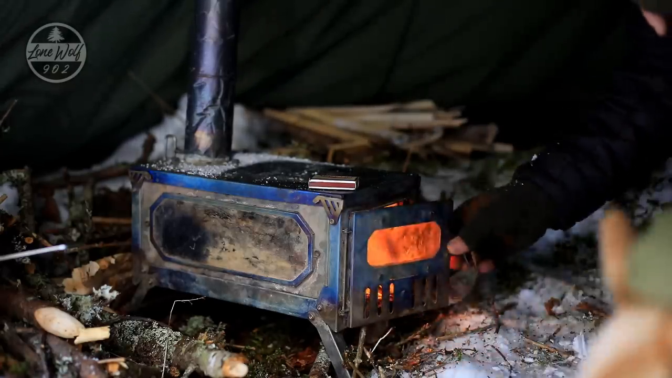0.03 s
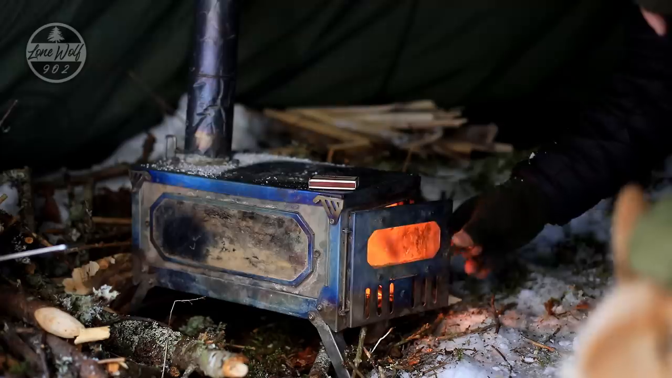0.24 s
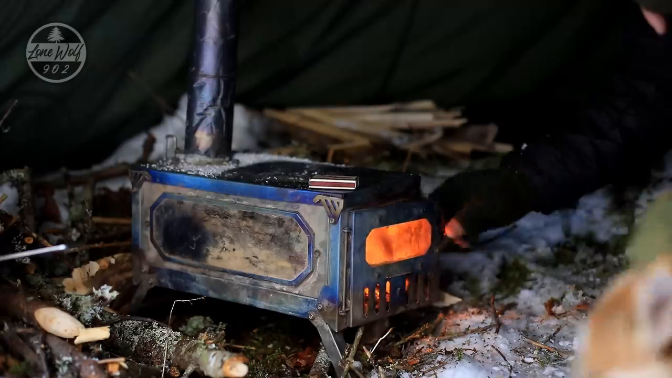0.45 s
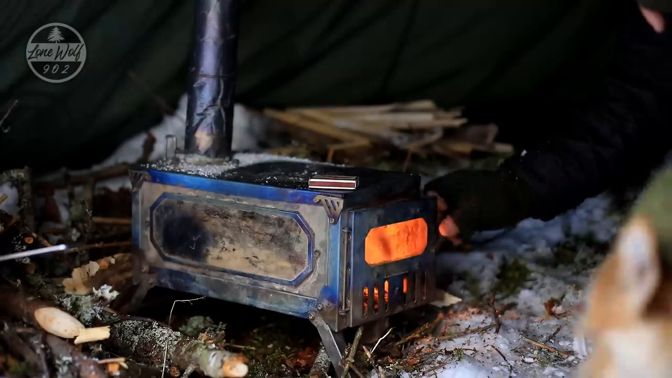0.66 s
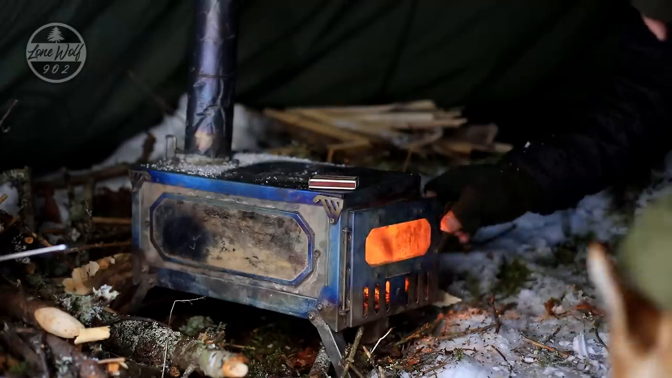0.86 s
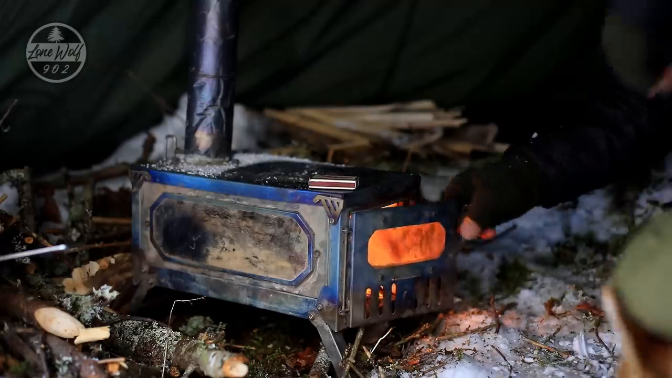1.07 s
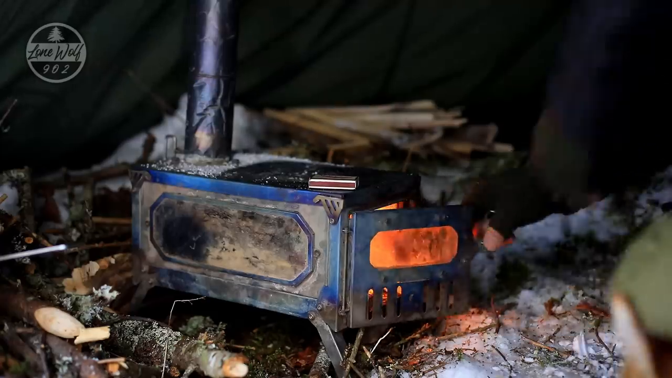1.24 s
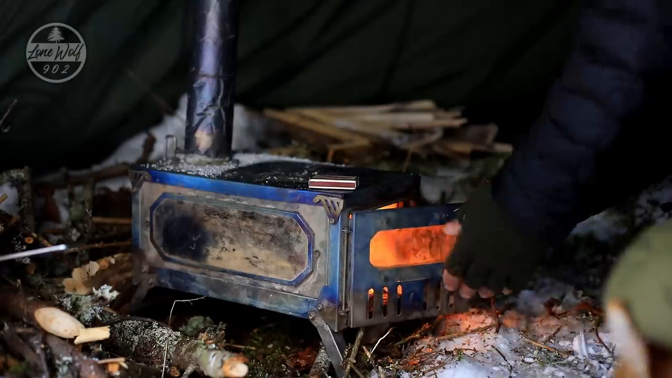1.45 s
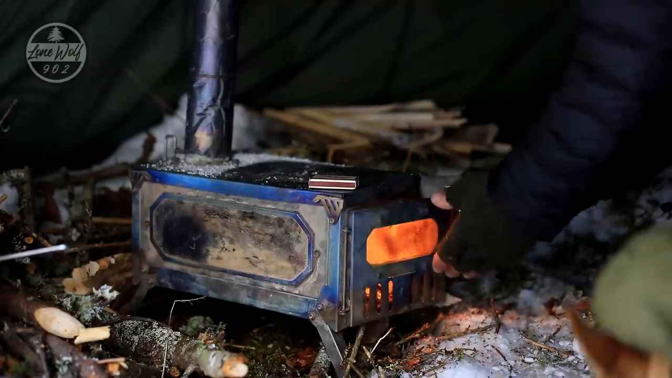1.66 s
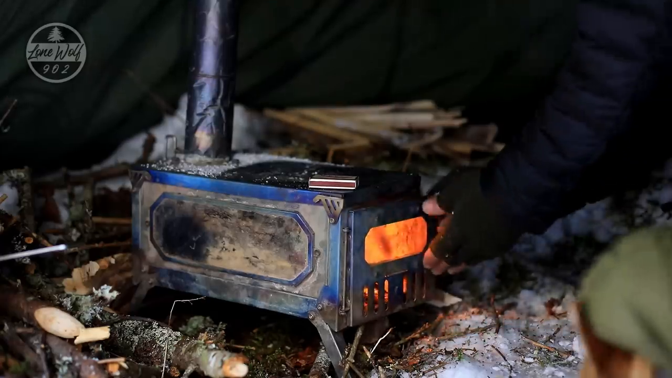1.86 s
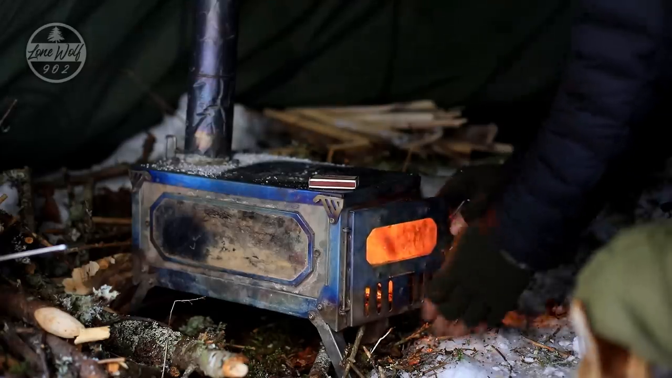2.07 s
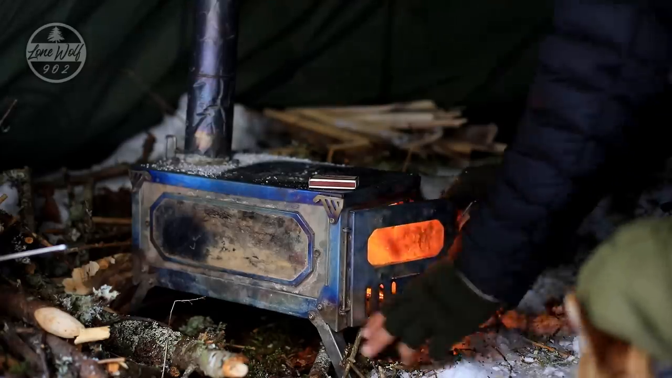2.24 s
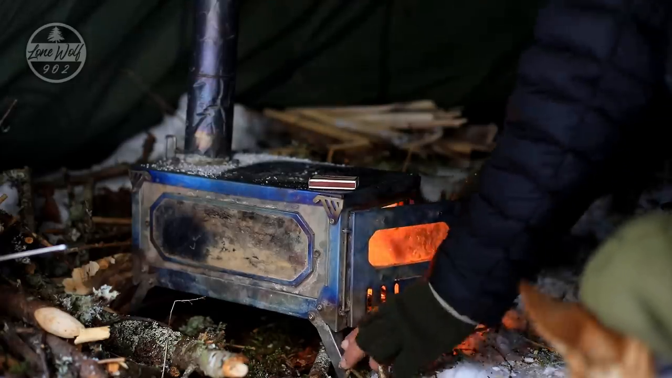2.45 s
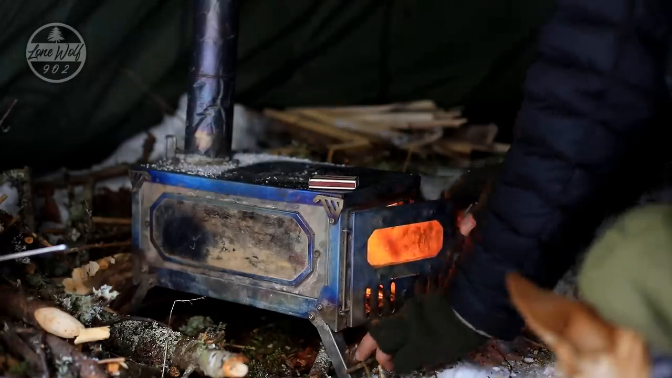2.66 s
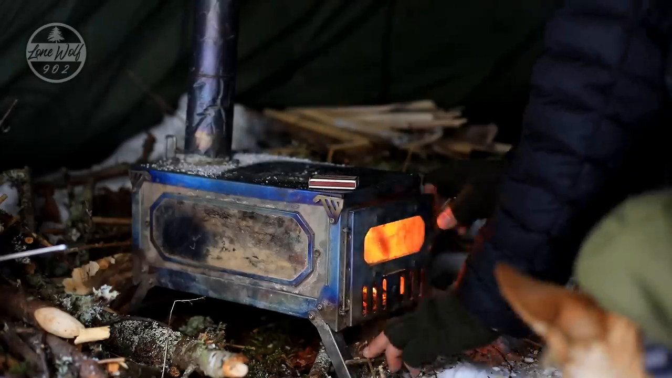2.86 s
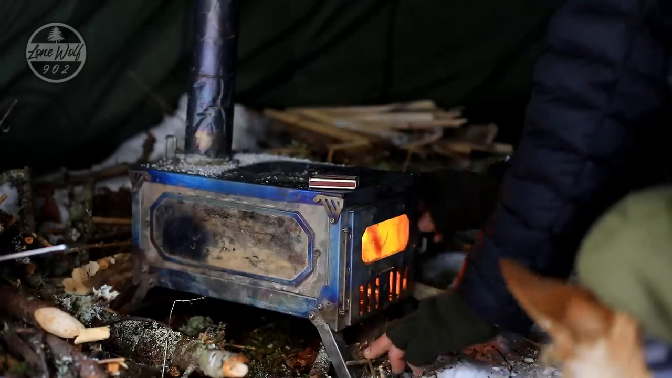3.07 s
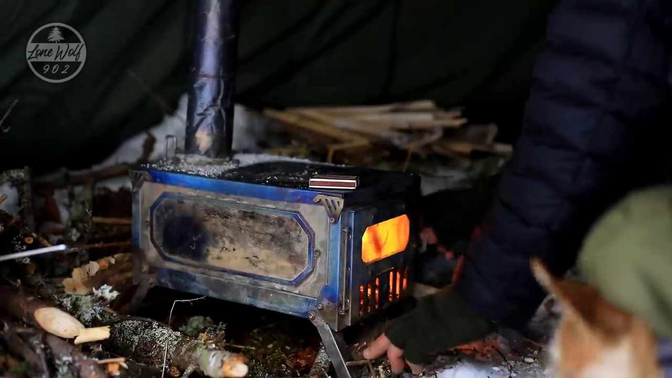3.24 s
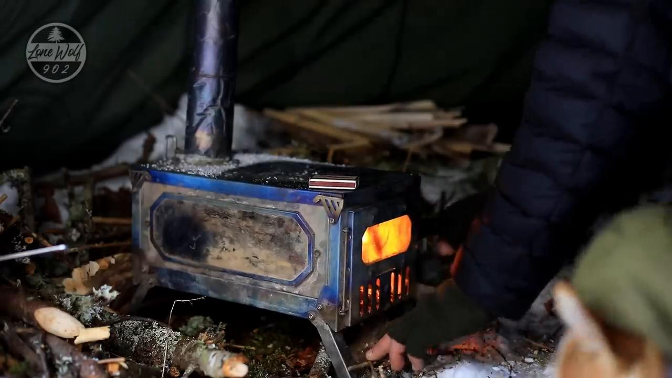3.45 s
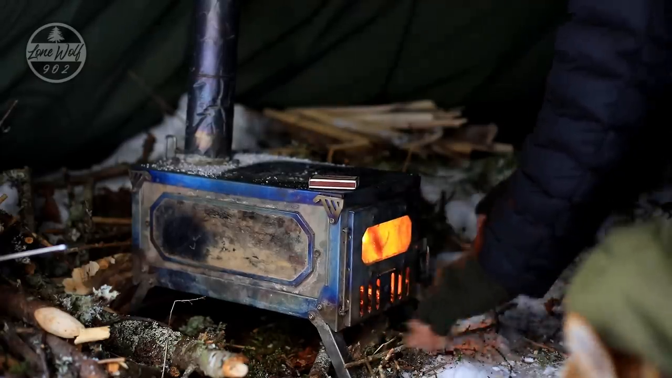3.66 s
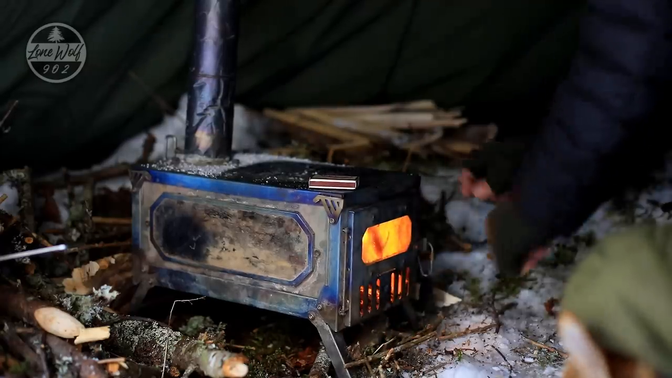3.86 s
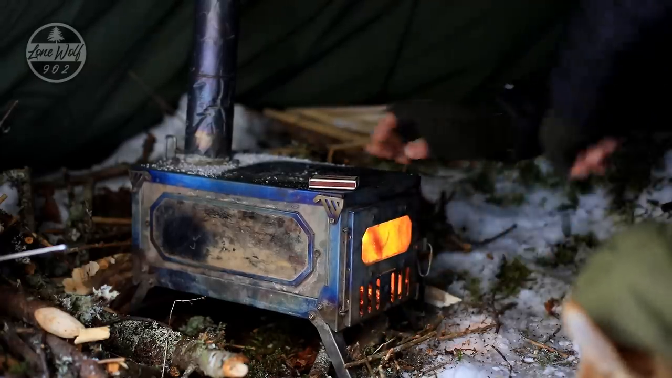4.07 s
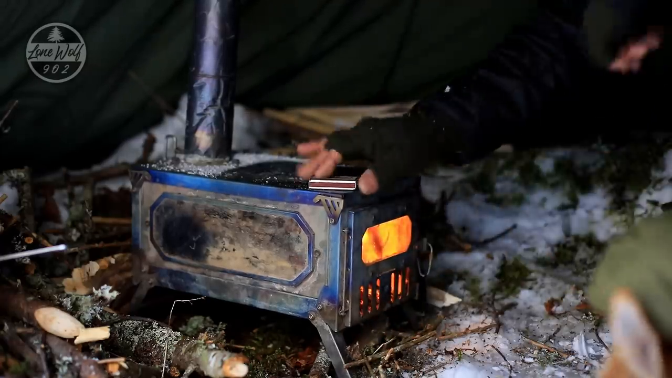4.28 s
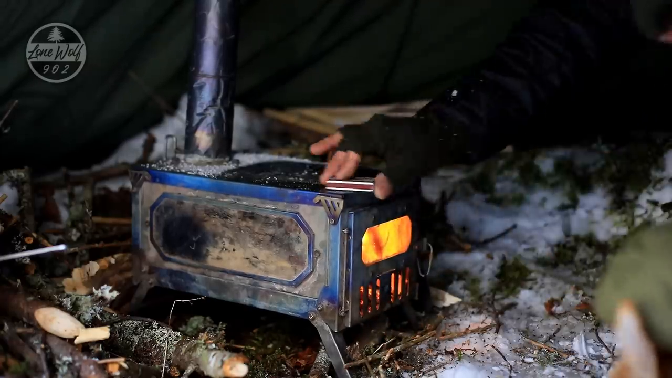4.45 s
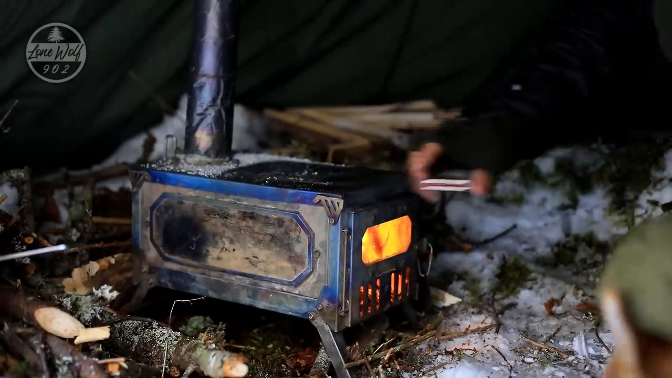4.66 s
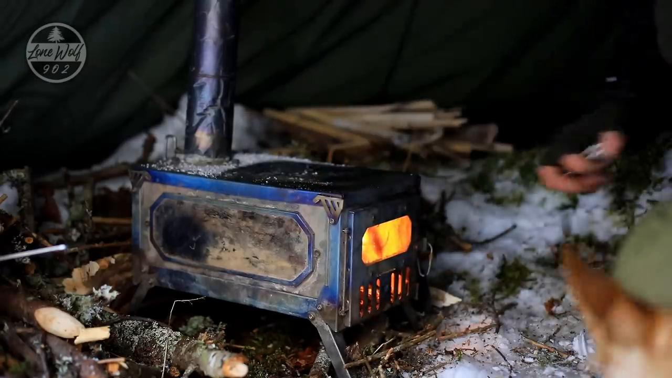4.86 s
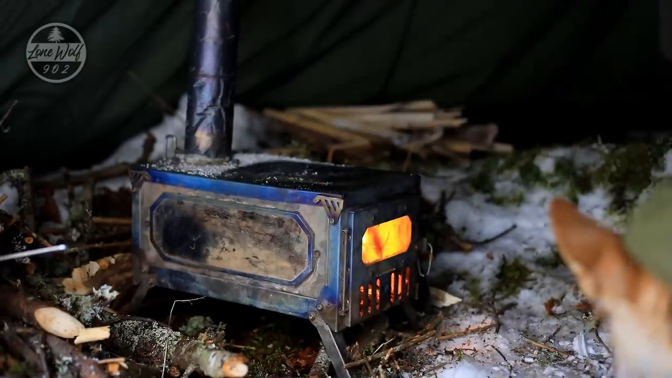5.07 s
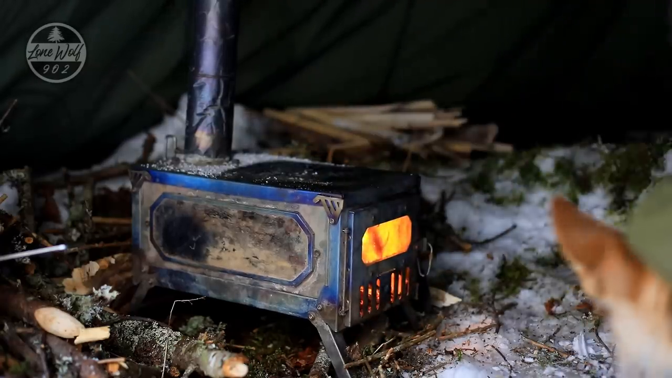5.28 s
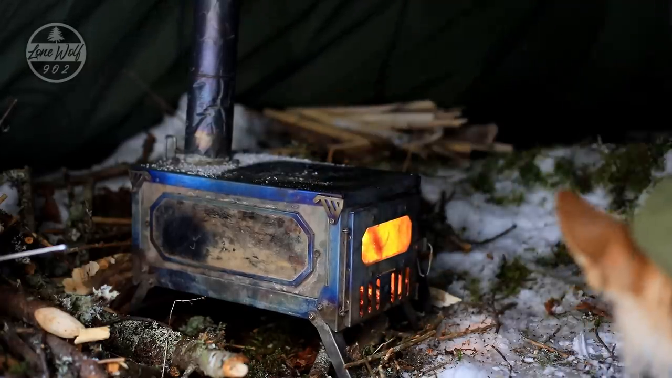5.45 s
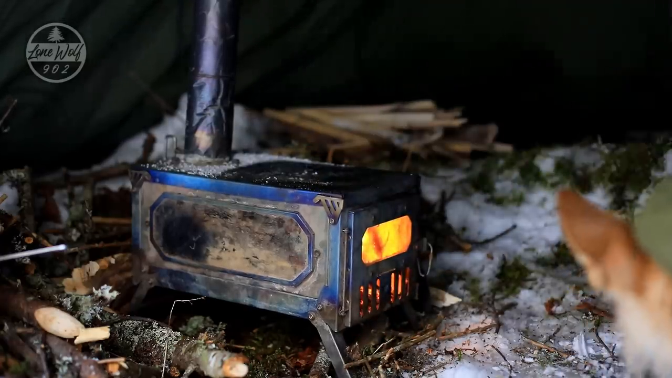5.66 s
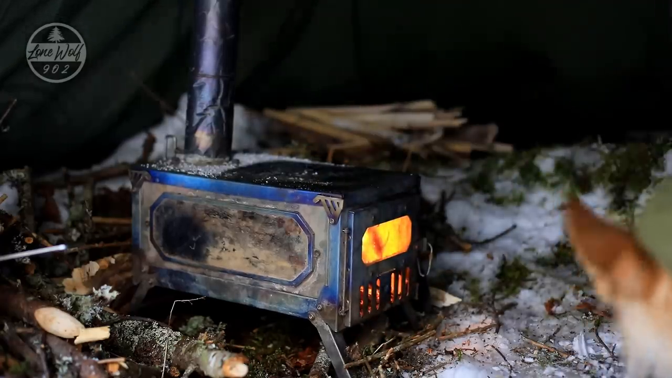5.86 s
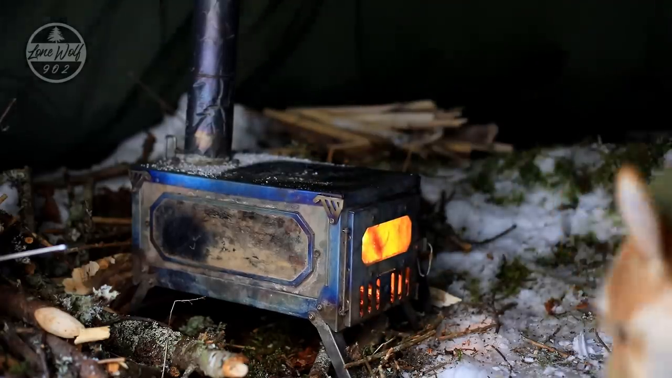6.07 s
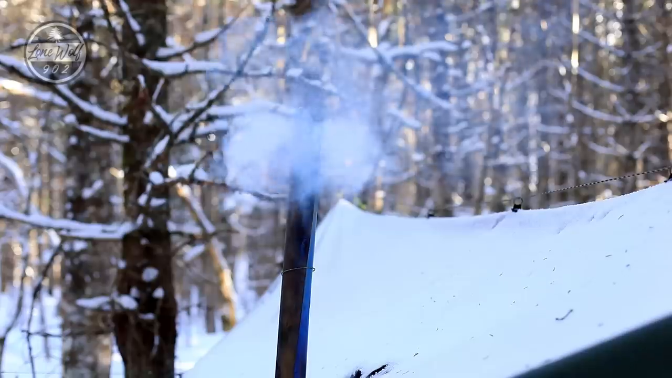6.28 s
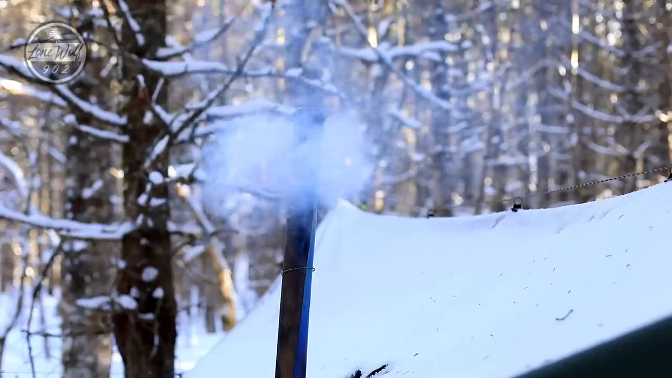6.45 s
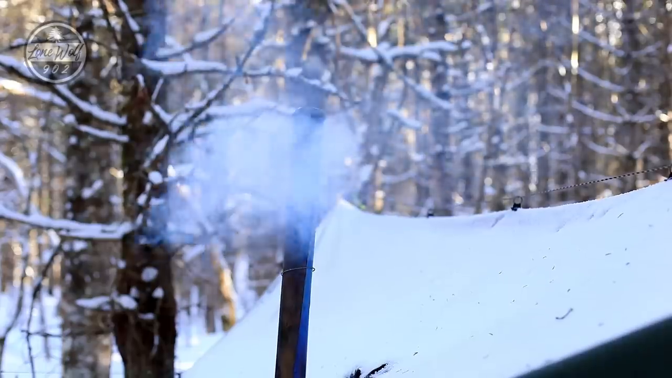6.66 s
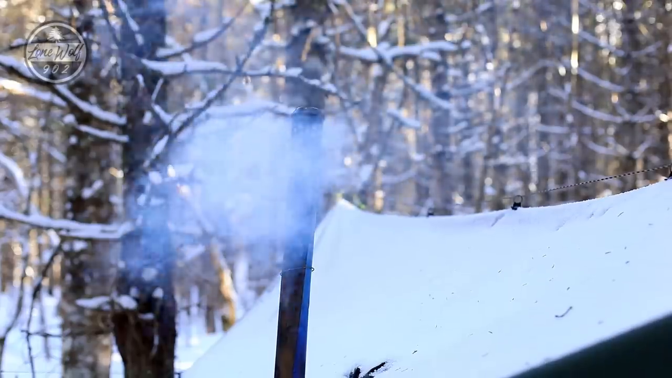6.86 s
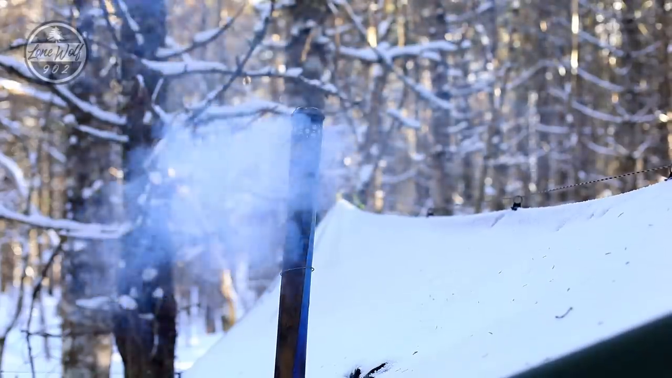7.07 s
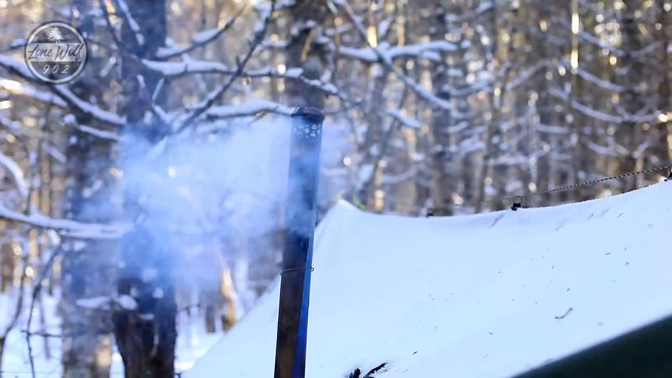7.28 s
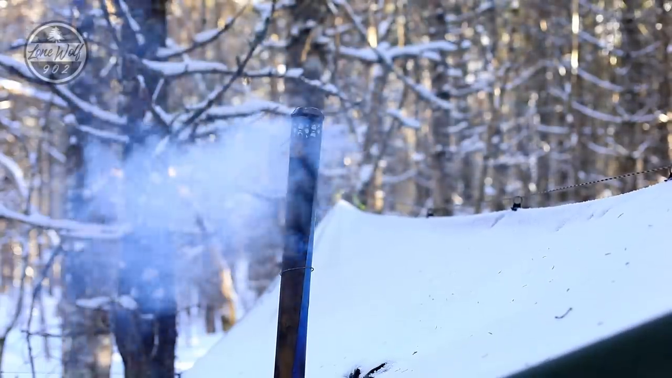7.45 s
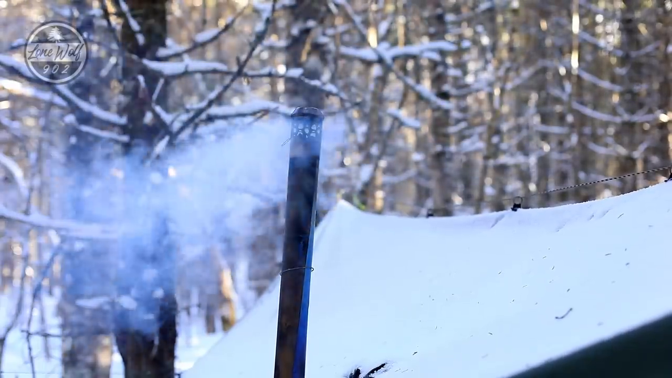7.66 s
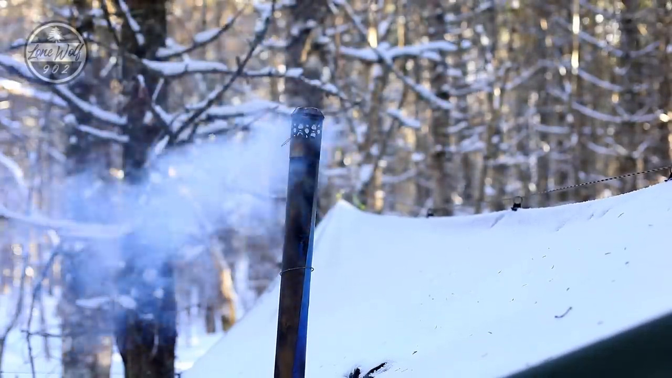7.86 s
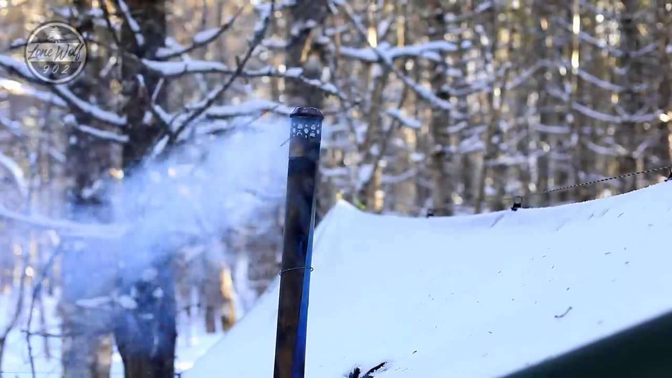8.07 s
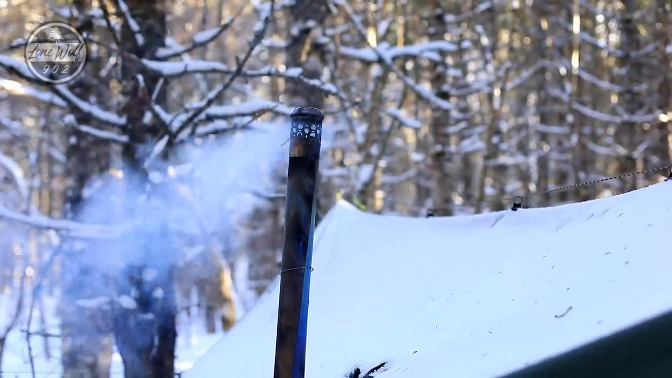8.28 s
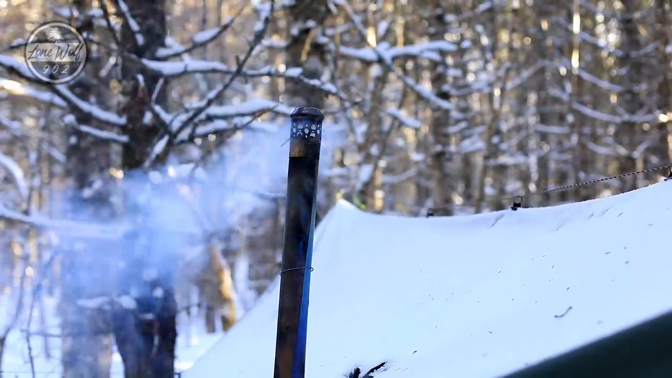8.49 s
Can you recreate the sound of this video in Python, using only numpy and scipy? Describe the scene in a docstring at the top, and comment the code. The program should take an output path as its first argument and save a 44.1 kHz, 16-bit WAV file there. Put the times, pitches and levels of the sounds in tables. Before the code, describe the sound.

A small steel stove door knocks, clanks and latches with bright clinks, then a sleeve swishes and the fire's soft draught swells.

```python
"""Latch clinks and wood knocks over a hissing fire: a small sheet-steel stove is stoked in a tent.
Each blow rattles the thin panels; heavy ones thump the firebox. The steel latch rings until
the catch chokes it. A padded nylon sleeve swishes as the arm reaches in and away, and a small
tool taps. The draught roars in the flue and hisses at the air slots, swelling once the door
is shut. One microphone, the same in both ears."""
import sys
import numpy as np
from scipy import signal
from scipy.io import wavfile
from scipy.ndimage import uniform_filter1d

SR = 44100
rng = np.random.default_rng(int(sys.argv[2]) if len(sys.argv) > 2 else 0)


def to_wav(sig):
    """Store sig (one row per channel, or 1-D mono) as 16-bit WAV at the path in sys.argv[1].

    Samples outside -1..1 are clipped; the rate is SR.
    """
    pcm = np.clip(np.atleast_2d(sig), -1, 1) * 32767
    pcm = np.round(pcm).astype(np.int16)
    wavfile.write(sys.argv[1], SR, pcm.T)  # frames by channels


N = 375776
TIME_S = np.arange(N) / SR
AGE_S = np.arange(SR // 2) / SR  # time since a blow

# Latch clinks. Each row: start in seconds, ring level in dB, treble tilt in dB per octave,
# spot struck (negative toward the catch, positive toward the handle).
LATCH_CLINKS = [(0.000, -28, 1, -0.31), (0.234, -43, 5, -.6), (0.270, -40, 3, .6), (0.295, -39, 1, -.6),
                (2.864, -38.5, -10, 0), (3.641, -29, -7, .3), (3.6665, -33, 8, -0.79),
                (3.7784, -14.5, 1.5, 1), (3.8322, -16.5, 0.5, -1.3), (3.84544, -24, 0, -1),
                (3.866, -28, -12, -1)]
# Latch modes. Each row: frequency in Hz, relative level in dB, t60 in seconds,
# gain in dB when struck at the handle, share of the ring that the catch stops.
LATCH_MODES = [(1265, -24, .06, 0, .3), (1669, -18, .12, 5, .3), (2090, -18, .13, -3, .2),
               (2234, -16, .09, 1, .3), (3284, -22, .12, 3, .5), (3623, 0, .19, 0, .92),
               (3680, -20, .14, 0, .3), (4377, -25, .11, 3, .3), (4856, -19.5, .12, -4, .2),
               (5534, -25, .2, 0, .3), (6498, -30, .15, 0, .3), (6745, -24, .3, 2, .2),
               (7634, -28, .25, -5, .1), (7736, -24, .22, 3, .1), (10433, -21, .14, -2, .4),
               (10980, -29, .15, 7, .5), (11730, -33, .15, 3, .4), (12400, -30, .1, 5, .3),
               (13600, -25, .085, 1, .4), (14800, -30, .08, -5, .4), (15160, -31, .07, 0, .3)]
# Thin-steel clatter, catch tick and hollow tap colours.
# Each row: frequency in Hz, relative density in dB, base t60 in seconds.
STEEL_COLOUR = [(100, -33, .08), (500, -6, 0.13), (1000, -4.5, 0.17), (1960, 0.5, 0.15), (2460, -2, 0.1),
                (3520, 5.5, 0.089), (4970, 0, 0.066), (7160, -7, 0.06), (10000, -9.5, 0.062),
                (13000, -16, 0.068), (16000, -22, .045)]
TICK_COLOUR = [(500, -42, .05), (2200, 2, .06), (3230, 13, 0.12), (5040, -3, 0.11), (6600, 4.5, 0.12),
               (7800, -8, .06), (9000, 3, 0.063), (10500, -12, 0.076), (11700, -8, 0.086),
               (13500, -14, .05), (16000, -21, .04)]
TAP_COLOUR = [(200, -9, .04), (750, -17, .04), (1020, 0, 0.054), (1330, -22, 0.057), (1740, 9.5, 0.07),
              (2290, -11, 0.051), (3000, -5.5, 0.05), (4970, -16, 0.062), (8000, -29, .04),
              (16000, -31, .04)]
# Steady fire, flue roar and air-slot hiss. Each row: frequency in Hz, relative density in dB.
FIRE_SPECTRUM = [(15, -3), (30, 4), (44, 4), (60, 3), (130, 0.5), (300, -1.5), (450, -0.5), (680, 0),
                 (950, -2), (1450, 0), (2100, -4.5), (2900, -9), (3650, -6.5), (4700, -17.5), (6500, -25),
                 (10000, -28), (16000, -32)]
FLUE_SPECTRUM = [(60, -27), (120, 1.5), (180, 3.5), (320, 3), (550, -0.5), (1000, 1), (1500, 4), (2200, -3),
                 (3500, -4), (4800, -14.5), (7000, -21.5), (11000, -37.5), (16000, -49)]
SLOT_SPECTRUM = [(300, -13), (1500, -6), (2500, -1), (3200, -1.5), (3900, 2), (4400, -2.5), (5000, -6.5),
                 (6000, -17), (9000, -28.5), (16000, -41)]
# Draught, slack while the door is worked. Each row: time in seconds, flue roar in dB.
DRAUGHT_CURVE = [(0, -43), (.4, -41.5), (1.1, -51.5), (3.4, -57), (4.1, -48.5), (5.4, -41), (6.2, -41.5),
                 (7.2, -39.5), (8.5, -41.5)]
# Draught surges. Each row: peak time in seconds, Gaussian width in seconds, flue roar in dB,
# slot hiss in dB.
DRAUGHT_SURGES = [(5.82, 0.55, -57, -39.5), (6.75, 0.26, -38.5, -48.5)]
# Ticks of the catch; taps on the stove and of a small tool lifted off it and put down.
# Each row: start in seconds, level in dB, tilt in dB per octave.
CATCH_TICKS = [(0.260, -38, 0), (0.36, -35.5, 2), (2.591, -33, 1), (2.595, -30, 5), (3.254, -32, -8),
               (3.268, -34.5, -6), (3.5144, -40, 2)]
LIGHT_TAPS = [(3.641, -30.5, -2.5), (4.368, -23.5, -2.5), (4.910, -29, 2.5), (4.920, -29.5, 3.5),
              (4.938, -27, 1)]
# Wood and door hitting the firebox. Each row: start in seconds, clatter level in dB,
# tilt in dB per octave, thump level in dB.
FIREBOX_KNOCKS = [(0.470, -30.5, -4.5, -25), (0.508, -24.5, -5, -16.5), (1.812, -37.5, -5, -39),
                  (2.676, -35.5, -4, -50), (2.699, -43, -5, -29.5), (2.892, -35.5, -5, -34),
                  (3.072, -30, -7, -55), (3.0874, -16, -0.2, -10.5), (3.269, -32, -2.5, -30.5),
                  (3.5143, -28, 2.5, -60), (3.549, -32, -4.5, -21.5), (3.559, -33.5, -1, -54),
                  (3.659, -31.5, 0, -60), (3.903, -30, -1, -60)]
# Low modes of the firebox and its air; clearest modes of the side panels.
# Each row: frequency in Hz, relative level in dB, base t60 in seconds.
THUMP_MODES = [(109, -32, 0.053), (191.5, -4.5, 0.094), (277, 2.5, 0.04)]
PANEL_MODES = [(900, -24, .08), (1150, -23, .08), (1430, -18, .08), (1933, -14, .07), (2676, -21, .1),
               (3340, -16, .09), (3720, -16, .07), (4727, -22, .07), (5087, -22, .07), (6072, -24, .06),
               (6691, -23, .06), (7671, -27, .07)]
# Arm strokes, sleeve on jacket. Each row: start in seconds, length in seconds,
# slowing time in seconds, relative swish level in dB, flop level in dB.
ARM_STROKES = [(0.925, 0.73, .38, -45, -45), (1.745, 0.51, 0.18, -69, -49), (2.19, .19, .08, -60, -63),
               (2.588, 0.13, .06, -54, -52), (3.87, 0.6, 0.58, -51, -56), (4.294, 0.36, 0.096, -45.5, -48),
               (4.71, 0.32, .16, -59, -65), (5.088, 0.27, 0.16, -56, -41)]
# Nylon swish and padding flop. Each row: frequency in Hz, relative density in dB.
NYLON_SPECTRUM = [(200, 2.5), (1500, 3), (3000, 5.5), (4500, 3.5), (6200, -0.5), (10000, -2), (12500, -5.5),
                  (16000, -13)]
PADDING_SPECTRUM = [(40, -13), (120, -7), (260, 2.5), (450, -10), (900, -13), (3000, -22), (16000, -50)]


def gain_of(db):
    """Decibels to amplitude."""
    return 10 ** (np.asarray(db) / 20)


def unit_rms(x):
    """Scales to rms 1."""
    return x / np.sqrt(np.mean(x ** 2) + 1e-20)


def lookup(table, hz, column=1):
    """Interpolates a column over log frequency."""
    columns = np.transpose(table)
    return np.interp(np.log(hz + 1), np.log(columns[0]), columns[column])


def add(mix, start_s, sound):
    """Mixes a sound in at start_s."""
    part = mix[max(round(start_s * SR), 0):][:len(sound)]
    part += sound[:len(part)]


def mode(hz, t60_s):
    """One damped vibration."""
    return np.sin(2 * np.pi * hz * AGE_S) * np.exp(-np.log(1000) * AGE_S / t60_s)


def clatter(colour, tilt_db_oct, rise_s, t60_scale, crack, crack_s):
    """Dense modes, each band dying at its own rate, with a short crack in front."""
    hz, frame_s, bands = signal.stft(rng.standard_normal(len(AGE_S)), SR, nperseg=128)
    octaves = np.log2(np.maximum(hz, 500) / 4000)
    shape = unit_rms(gain_of(lookup(colour, hz) + tilt_db_oct * octaves))
    t60_s = lookup(colour, hz, column=2) * t60_scale
    decay = gain_of(-60 * frame_s / t60_s[:, None])
    tail = signal.istft(bands * shape[:, None] * decay, SR, nperseg=128)[1][:len(AGE_S)]
    attack = np.minimum(AGE_S / max(rise_s, 1e-5), 1)
    return tail * attack * (1 + crack * np.exp(-AGE_S / crack_s)) / (1 + crack / 2)


def latch():
    """The steel handle rings freely, then rests on the catch, which chokes its main mode."""
    out = np.zeros(N)
    full_clink_db, contact_db = -15.5, -11
    for start_s, ring_db, tilt_db_oct, spot in LATCH_CLINKS:
        free_s = 0.037 * gain_of(0.27 * (ring_db - full_clink_db))  # weak clinks settle sooner
        choke = (1 + np.tanh((AGE_S - free_s) / 0.0035)) / 2
        for hz, mode_db, t60_s, handle_db, stopped in LATCH_MODES:
            level_db = ring_db + mode_db + spot * handle_db + tilt_db_oct * max(np.log2(hz / 3600), 0)
            add(out, start_s, gain_of(level_db) * mode(hz, t60_s) * (1 - stopped * choke))
        contact = clatter(STEEL_COLOUR, 0, rise_s=0.00079, t60_scale=3.6, crack=0.97, crack_s=0.0049)
        add(out, start_s, gain_of(ring_db + contact_db) * contact)
    return out


def noise(spectrum, patchy_db, flicker_db):
    """Noise of rms 1 with drifting patches of colour and a flicker shared by all bands."""
    frames, hz = N // 512 + 5, np.fft.rfftfreq(2048, 1 / SR)
    real, imag, patches = rng.standard_normal((3, frames, len(hz)))
    patches = uniform_filter1d(patches, size=7, axis=0)
    patches = unit_rms(uniform_filter1d(patches, size=20, axis=1))
    flicker = unit_rms(uniform_filter1d(rng.standard_normal(frames), size=8))[:, None]
    level_db = lookup(spectrum, hz) + patchy_db * patches + flicker_db * flicker
    bands = (real + 1j * imag) * gain_of(level_db)
    return unit_rms(signal.istft(bands.T, nperseg=2048, noverlap=1536)[1][:N])


def fire():
    """Steady burning hiss; its low rumble holds, then fades."""
    burning = gain_of(-41) * noise(FIRE_SPECTRUM, patchy_db=0.55, flicker_db=0.93)
    rumble = signal.sosfiltfilt(signal.butter(1, [55, 150], "band", fs=SR, output="sos"), burning)
    fade_start_s, fade_db_per_s = 5.86, 13
    rumble_db = np.clip(3.5 - fade_db_per_s * (TIME_S - fade_start_s), -8, 3.5)
    return burning + (gain_of(rumble_db) - 1) * rumble


def draught():
    """Drawn air roars in the flue and hisses at the door's slots; surges add in power."""
    roar = gain_of(np.interp(TIME_S, *np.transpose(DRAUGHT_CURVE)))
    hiss = gain_of(-54)
    for peak_s, width_s, roar_db, hiss_db in DRAUGHT_SURGES:
        swell = np.exp(-((TIME_S - peak_s) / width_s) ** 2 / 2)
        roar = np.hypot(roar, gain_of(roar_db) * swell)
        hiss = np.hypot(hiss, gain_of(hiss_db) * swell)
    flue = roar * noise(FLUE_SPECTRUM, patchy_db=0.16, flicker_db=0.28)
    slots = hiss * noise(SLOT_SPECTRUM, patchy_db=1.3, flicker_db=-0.05)
    return flue + slots


def catch():
    """The door's catch scrapes in bright ticks."""
    out = np.zeros(N)
    for start_s, level_db, tilt_db_oct in CATCH_TICKS:
        tick = clatter(TICK_COLOUR, tilt_db_oct, rise_s=0.0025, t60_scale=1, crack=1.4, crack_s=0.0056)
        add(out, start_s, gain_of(level_db) * tick)
    return out


def panel_blow(tilt_db_oct, rise_s, t60_scale):
    """One contact with thin steel: clear panel modes over a dense clatter."""
    signs = rng.choice([-1, 1], len(PANEL_MODES))  # polarity depends on the spot struck
    ring = sum(sign * gain_of(db) * mode(hz, t60_s * t60_scale)
               for sign, (hz, db, t60_s) in zip(signs, PANEL_MODES))
    ring *= 1 - np.exp(-AGE_S / 0.0017)  # the blow spreads over the panels
    return ring + clatter(STEEL_COLOUR, tilt_db_oct, rise_s, t60_scale, crack=0.92, crack_s=0.0027)


def firebox():
    """Knocks rattle the steel; heavy ones also thump the box and rock it on its legs."""
    out = np.zeros(N)
    middling_db, rock_db, rock_lag_s = -31.5, -8.5, 0.018
    # neighbouring modes swing in opposite senses, so the thump swells for a few ms
    thump = sum((-1) ** k * gain_of(db) * mode(hz, t60_s)
                for k, (hz, db, t60_s) in enumerate(THUMP_MODES))
    thump *= 1 - np.exp(-AGE_S / 0.0034)
    rocking = mode(hz=42.4, t60_s=0.22) * (1 - np.exp(-AGE_S / 0.021)) ** 2
    for start_s, clatter_db, tilt_db_oct, thump_db in FIREBOX_KNOCKS:
        rise_s = 0.001 * gain_of(1.8 * (middling_db - clatter_db))  # harder blow, shorter contact
        add(out, start_s, gain_of(clatter_db) * panel_blow(tilt_db_oct, rise_s, t60_scale=1.29))
        add(out, start_s, gain_of(thump_db) * thump)
        add(out, start_s + rock_lag_s, gain_of(thump_db + rock_db) * rocking)
    return out


def judder(slips):
    """A shove sticks and slips along the steel: a short crunch that swells and dies."""
    out = np.zeros(N)
    start_s, peak_s, gap_s, fade_db_per_s = 0.4945, 0.511, 0.0085, 362
    for slip_s in start_s + gap_s * np.arange(slips):
        level_db = -18.5 - fade_db_per_s * abs(slip_s - peak_s)
        add(out, slip_s, gain_of(level_db) * panel_blow(tilt_db_oct=2, rise_s=0.003, t60_scale=0.64))
    return out


def weave_zip(age_s):
    """The weave's zip: noise through a resonance that climbs during the stroke."""
    start_hz, climb_hz_per_s, width_hz = 2500, 4600, 930
    carrier = np.exp(2j * np.pi * np.cumsum(start_hz + climb_hz_per_s * age_s) / SR)
    pole = np.exp(-np.pi * width_hz / SR)
    friction = rng.standard_normal(SR)[:len(age_s)]
    baseband = signal.lfilter([1 - pole], [1, -pole], friction / carrier)
    return unit_rms((carrier * baseband).real)


def sleeve():
    """Nylon threads slide over each other in a grainy swish; the padding flops as a stroke starts."""
    speed, push, weave = np.zeros((3, N))
    attack_s, flop_rise_s, zip_db, grain_db = 0.12, 0.043, -9.5, 0.83
    flop_envelope = AGE_S / flop_rise_s * np.exp(1 - AGE_S / flop_rise_s)
    for start_s, length_s, slowing_s, swish_db, flop_db in ARM_STROKES:
        age_s = np.arange(0, length_s, 1 / SR)
        ramps = np.clip([age_s / attack_s, (length_s - age_s) / slowing_s], 0, 1)
        stroke = gain_of(swish_db) * np.sin(np.pi / 2 * ramps).prod(axis=0)
        add(speed, start_s, stroke)
        add(weave, start_s, stroke * weave_zip(age_s))
        add(push, start_s, gain_of(flop_db) * flop_envelope)
    grain = unit_rms(uniform_filter1d(rng.standard_normal(N), size=90))
    nylon = noise(NYLON_SPECTRUM, patchy_db=2.1, flicker_db=1.7)
    swish = speed * unit_rms(nylon * gain_of(grain_db * grain))
    flop = push * noise(PADDING_SPECTRUM, patchy_db=2, flicker_db=2)
    return gain_of(6) * (swish + gain_of(zip_db) * weave) + flop


def taps():
    """Light contacts with the stove: short, hollow, hardly any ring."""
    out = np.zeros(N)
    for start_s, level_db, tilt_db_oct in LIGHT_TAPS:
        tap = clatter(TAP_COLOUR, tilt_db_oct, rise_s=0.0004, t60_scale=1, crack=0.82, crack_s=0.0045)
        add(out, start_s, gain_of(level_db) * tap)
    return out


def scene():
    """Dry mono mix on two channels; canvas and snow return almost no echo."""
    mono = firebox() + judder(slips=6) + latch() + taps() + catch() + sleeve() + fire() + draught()
    return np.tile(mono, (2, 1))


def record(dry):
    """The recorder's band limit."""
    cutoff_hz = 15850
    lowpass = signal.firwin(511, cutoff_hz, window=("kaiser", 9), fs=SR)
    return signal.oaconvolve(dry, lowpass[None], "same")


dry = scene()
out = record(dry)
to_wav(out)
```